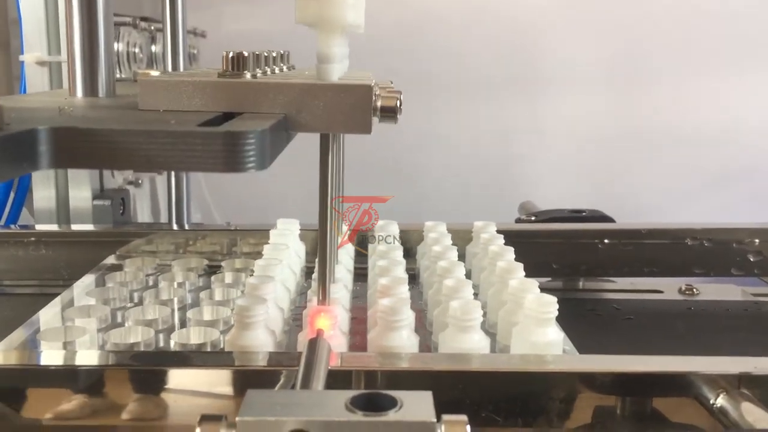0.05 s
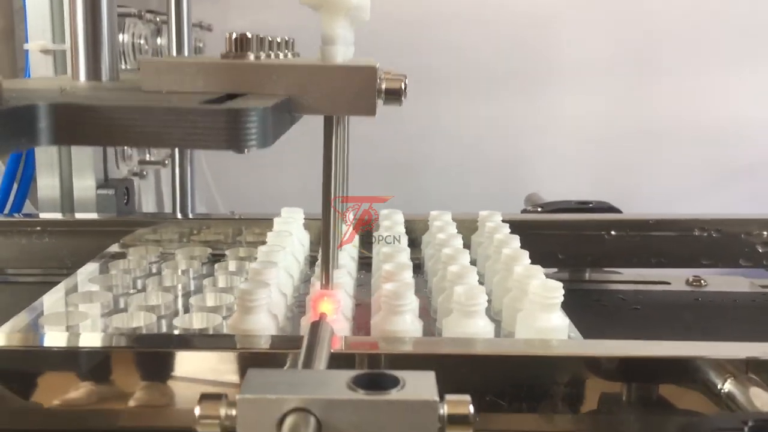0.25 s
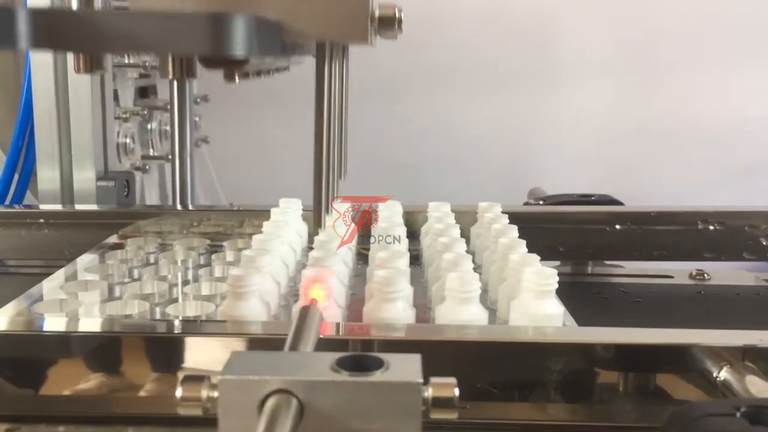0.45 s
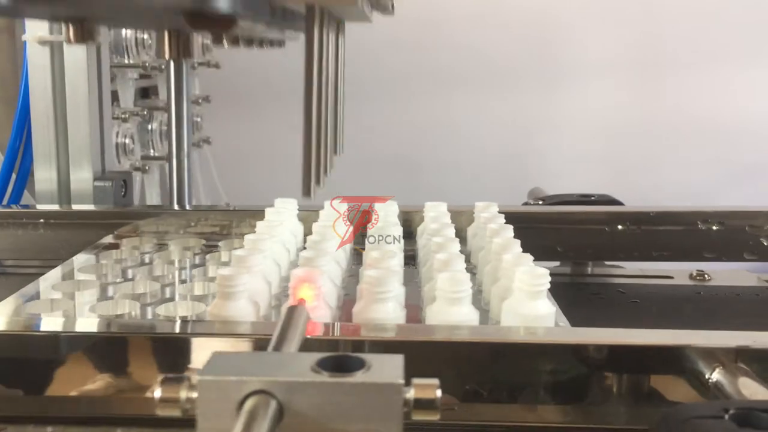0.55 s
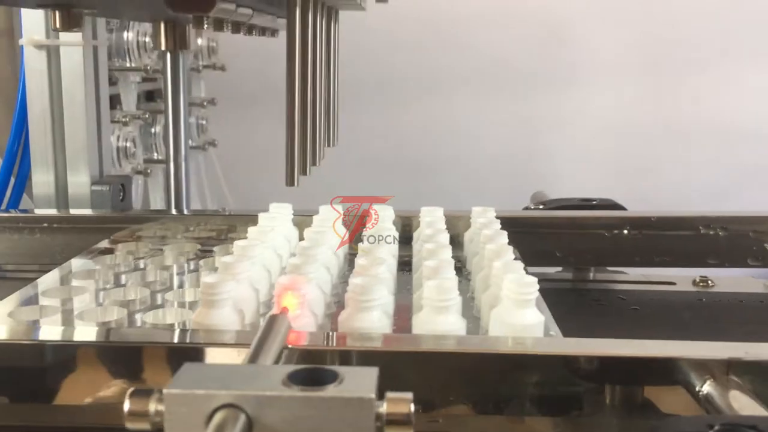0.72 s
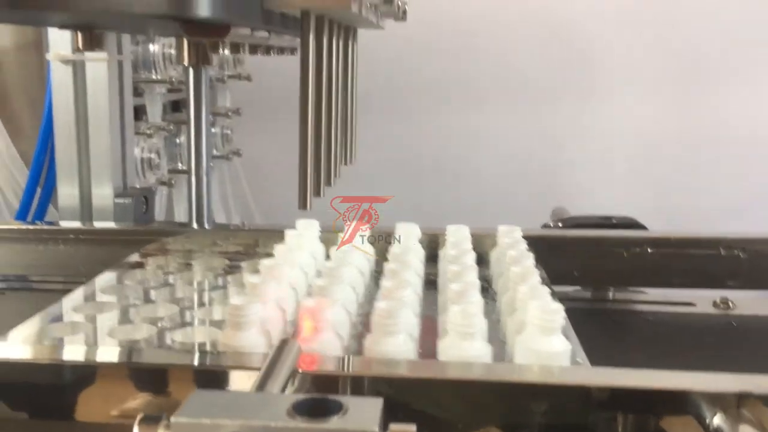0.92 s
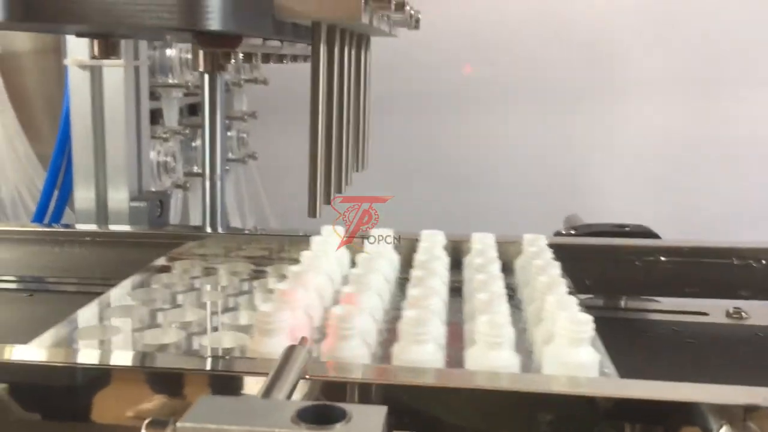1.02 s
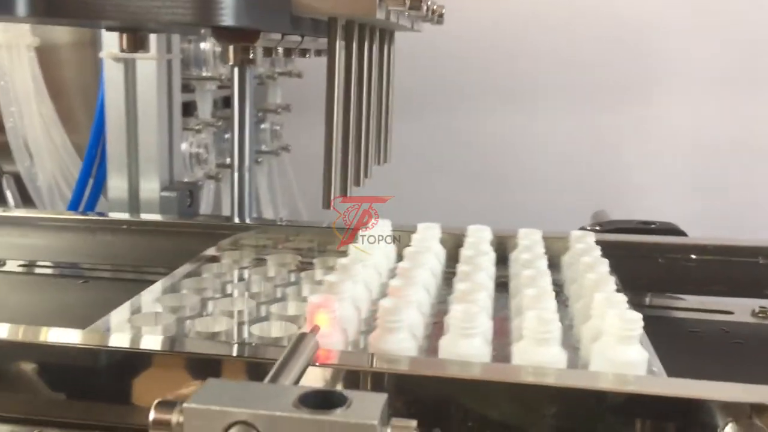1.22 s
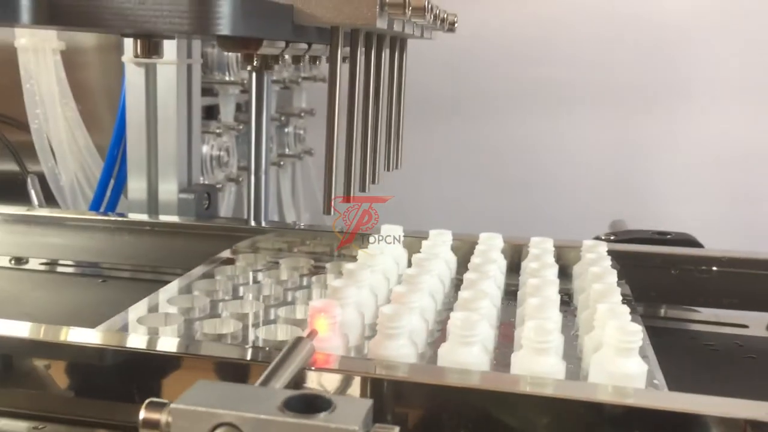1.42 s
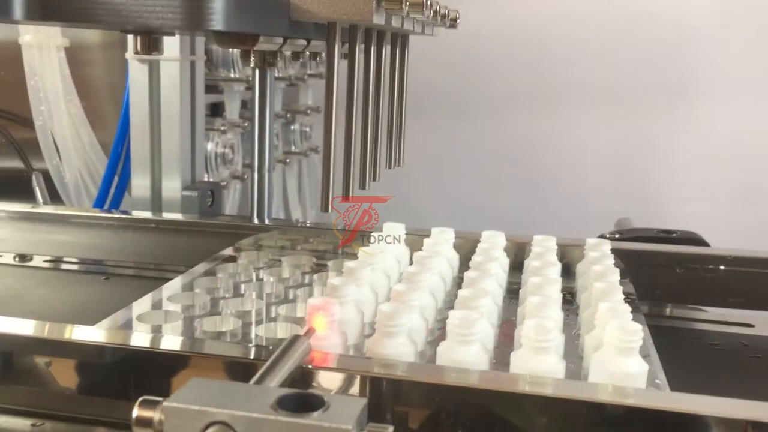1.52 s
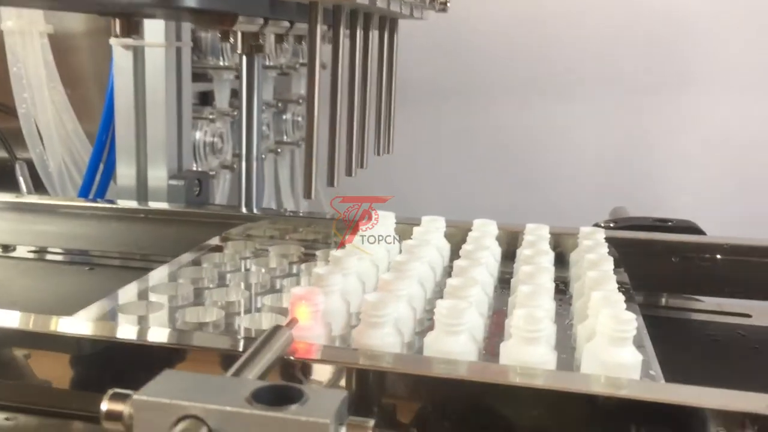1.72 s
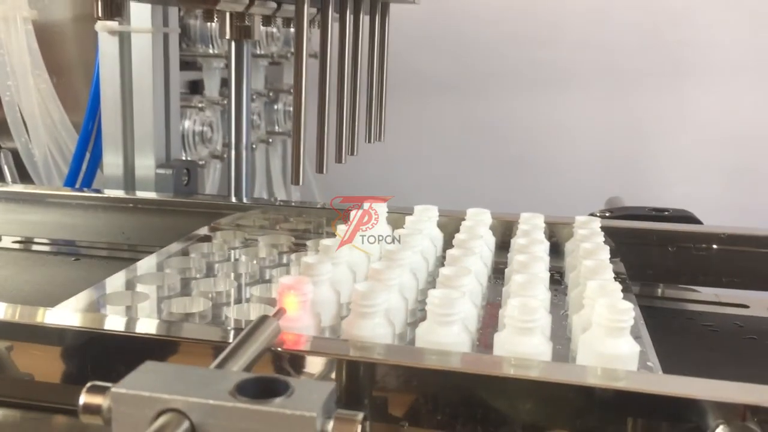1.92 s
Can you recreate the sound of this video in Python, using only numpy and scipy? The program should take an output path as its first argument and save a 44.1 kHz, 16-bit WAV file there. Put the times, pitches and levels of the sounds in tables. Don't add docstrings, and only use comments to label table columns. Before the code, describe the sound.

A hard metal clack and pneumatic hiss from a filling machine, ending in a dull thud indoors

```python
import sys
import numpy as np
from scipy import signal
from scipy.fft import rfft, irfft
from scipy.io import wavfile
from scipy.ndimage import uniform_filter1d

SR = 44100
rng = np.random.default_rng(int(sys.argv[2]) if len(sys.argv) > 2 else 0)


def generate_wav(sig):
    pcm = np.round(np.clip(np.atleast_2d(sig).T, -1, 1) * 32767).astype(np.int16)
    wavfile.write(sys.argv[1], SR, pcm)


def level_to_linear(level):
    exponent = np.asarray(level, float) / 20
    return 10 ** exponent


N = 85995


def evened(x):
    return x / np.sqrt(np.mean(x ** 2) + 1e-20)


def read(points, hz):
    f, value = np.transpose(points)
    return np.interp(np.log(hz + 1), np.log(f + 1), value)


def level(curve):
    s, db = np.transpose(curve)
    return level_to_linear(np.interp(np.arange(N) / SR, s, db))


def resonate(x, hz, width):
    turn = np.exp(2j * np.pi * hz * np.arange(len(x)) / SR)
    pole = np.exp(-np.pi * width / SR)
    return 2 * (turn * signal.lfilter([1 - pole], [1, -pole], x / turn)).real


def resonate_twice(x, hz, width):
    return evened(resonate(resonate(x, hz, width), hz, width))


def noise(spectrum, patchy_db, flicker_db):
    frames = N // 128 + 5
    a, b, patches = rng.standard_normal((frames, 257, 3)).T
    patches = uniform_filter1d(patches, size=5, axis=0)
    patches = evened(uniform_filter1d(patches, size=14, axis=1))
    flicker = evened(uniform_filter1d(rng.standard_normal(frames), size=4))
    z = (a + 1j * b) * level_to_linear(patchy_db * patches + flicker_db * flicker)
    x = signal.istft(z, nperseg=512, noverlap=384)[1][:N]
    colour = level_to_linear(read(spectrum, np.fft.rfftfreq(N, 1 / SR)))
    return evened(irfft(rfft(x) * colour, N))


def rings(peaks):
    return sum(level_to_linear(db) * resonate_twice(rng.standard_normal(N), hz, 1.5 * width) for hz, width, db in peaks)


def wobble(hz, wander):
    drift = uniform_filter1d(rng.standard_normal(N), size=3000)
    drift = evened(uniform_filter1d(drift, size=3000))
    return np.sqrt(2) * np.sin(2 * np.pi * np.cumsum(hz * (1 + wander * drift)) / SR)


def strike(hits, modes, soft_s):
    out, t = np.zeros(N), np.arange(SR // 2) / SR
    spots = rng.standard_normal((len(hits), len(modes)))
    for (s, db), spot in zip(hits, spots):
        ring = np.zeros(len(t))
        for (hz, mode_db, t60), luck in zip(modes, spot):
            ring += level_to_linear(mode_db + 2 * luck - 60 * t / t60) * np.sin(2 * np.pi * hz * t)
        ring *= 1 - np.exp(-t / soft_s)
        part = out[round(s * SR):][:len(t)]
        part += level_to_linear(db) * ring[:len(part)]
    return out


def hall():
    # frequency in Hz, density in dB per Hz.
    air_colour = [(40, -22), (90, -15), (103, 0), (139, -4.5), (302, 1.5), (376, -7.5), (654, -7.5),
                  (1330, -21), (5000, -40.5), (6500, -71.5), (11000, -120)]
    # time in seconds, level in dB.
    activity = [(0, -51.5), (.8, -46.5), (1.0, -46.5), (1.1, -50), (1.2, -46.5), (1.35, -51), (1.45, -53.5),
                (1.57, -50.5), (1.68, -54), (1.8, -51), (1.95, -51.5)]
    # frequency in Hz, width in Hz, level in dB.
    fans = [(700, 30, -66), (1050, 30, -66)]
    # time in seconds, level in dB.
    compressor = [(0, -79), (.17, -60), (.22, -45), (.9, -54.5), (1.05, -56), (1.1, -65.5), (1.18, -55),
                  (1.27, -68), (1.33, -50), (1.39, -67.5), (1.6, -67), (1.72, -75), (1.77, -53.5),
                  (1.82, -62), (1.87, -54), (1.95, -48)]
    # frequency in Hz, density in dB per Hz.
    hiss_colour = [(1180, -33), (2000, -3.5), (2180, -6.5), (2400, -3.5), (3370, -15), (16000, -24.5)]
    air = level(activity) * noise(air_colour, patchy_db=1.5, flicker_db=.8)
    hiss = level_to_linear(-72) * noise(hiss_colour, patchy_db=0, flicker_db=0)
    throb = level(compressor) * wobble(hz=63, wander=0.098)
    return air + hiss + rings(fans) + throb


def slide():
    # frequency in Hz, density in dB per Hz.
    rub_colour = [(35, -39), (60, -17.5), (233, -9.5), (437, -0.5), (1340, -2), (1620, -9), (4220, -16),
                  (12400, -29.5), (16000, -30.5)]
    # time in seconds, level in dB.
    travel = [(0, -39.5), (.08, -36.5), (.15, -39.5), (.24, -37), (.4, -42.5), (.66, -50), (.8, -86.5)]
    # frequency in Hz, width in Hz, level in dB.
    guide = [(494, 120, -1.5), (749, 200, -7.5), (1316, 76, -1), (4200, 400, -11)]
    rub = noise(rub_colour, patchy_db=.7, flicker_db=.6)
    return level(travel) * (rub + level_to_linear(-12) * evened(rings(guide)))


def ticks():
    # start in seconds, level in dB, ring in Hz, spread in Hz, t60 in seconds.
    taps_made = [(0.048, -38, 9050, 3460, 0.036), (0.1205, -36.5, 6600, 600, 0.02),
                 (.048, -42, 4500, 2500, 0.033), (.1205, -37.5, 4200, 2000, 0.049),
                 (.171, -36, 4500, 2500, .03), (0.12, -40, 10500, 3040, 0.054),
                 (.171, -36.5, 8140, 900, 0.018), (.1715, -39.5, 12500, 5000, 0.023),
                 (0.2418, -26, 9300, 1200, 0.074), (0.243, -25, 13500, 3000, 0.041),
                 (.6345, -29, 1600, 1100, 0.091), (.65, -44.5, 1200, 202.4, .8),
                 (.745, -47.5, 1220, 200, 0.27), (.06, -60, 12100, 39.5, 0.5),
                 (.733, -58.5, 13900, 2600, 0.14), (.718, -62, 7960, 1000, .04),
                 (.753, -66, 8800, 1600, .04), (.882, -63, 13500, 2530, .03),
                 (0.923, -49.5, 3470, 796, 0.064), (0.926, -61.5, 8700, 4020, 0.054),
                 (1.058, -62, 5170, 800, 0.045), (1.058, -64, 12850, 2500, 0.045),
                 (1.147, -60, 5000, 900, 0.07), (1.148, -57, 3033, 1500, 0.079),
                 (.99, -66, 6070, 120.3, .3), (1.148, -55.5, 13200, 2600, 0.13),
                 (1.15, -45, 765, 252, 0.16), (1.273, -65, 5700, 450, .03),
                 (1.322, -65.5, 14000, 2490, .02), (1.487, -72.5, 14000, 1983, 0.025),
                 (1.503, -66.5, 5530, 450, 0.033), (1.933, -66, 5300, 398, .03)]
    out, t = np.zeros(N), np.arange(5000) / SR
    fade_out = np.cos(np.pi / 2 * (t / t[-1]) ** 2)
    grains = rng.standard_normal((len(taps_made), len(t)))
    for (s, db, hz, spread, t60), grain in zip(taps_made, grains):
        tap = resonate_twice(grain, hz, 1.7 * spread) * level_to_linear(db - 60 * t / t60)
        tap *= np.minimum(t / (0.035 * t60), 1) * fade_out
        part = out[round(s * SR):][:len(t)]
        part += tap[:len(part)]
    return out


def latch():
    # frequency in Hz, level in dB, t60 in seconds.
    latch_modes = [(1134, -2, 0.01), (2530, -0.5, 0.0085), (2900, 0, 0.0081), (3700, -8, 0.01),
                   (4520, -12, 0.0067)]
    # start in seconds, level in dB.
    snaps = [
        (.2423, -15.5),
        (.2443, -18),
        (.2456, -9.5),
    ]
    return strike(snaps, latch_modes, soft_s=.0004)


def frame_shake():
    # frequency in Hz, width in Hz, level in dB.
    frame_peaks = [(61.53, 14, -12), (162, 63, -1.5), (245.4, 90, 1.5), (340, 48, 0.5), (450, 47, -6)]
    # time in seconds, level in dB.
    force = [(.25, -70), (.27, -25), (.35, -34), (.38, -39), (.55, -42), (.63, -44), (.75, -42.5),
             (1.0, -82)]
    return level(force) * evened(rings(frame_peaks))


def block():
    # frequency in Hz, level in dB, t60 in seconds.
    block_modes = [(75, -2.5, 0.09), (342, -6, 0.22), (535.3, -6.5, 0.069), (840, 0.5, 0.06),
                   (1013, -2.5, 0.05), (1225, -0.5, 0.054), (1510, 1, 0.034), (1850, -6, 0.04),
                   (2280, -7.5, 0.064), (2600, -6.5, 0.04), (2814, -5, .03), (3487, -7, .05)]
    # start in seconds, level in dB.
    rebounds = [(.2514, -29.5), (.2565, -18.5), (.2583, -21.5), (.2608, -18.5), (.2633, -23),
                (.2685, -21.5), (.2735, -29.5), (.287, -31)]
    return strike(rebounds, block_modes, soft_s=.0006)


def chatter():
    # frequency in Hz, density in dB per Hz.
    burst_colour = [(1180, -27), (2000, 3), (3810, -5), (4150, -2), (5730, -8), (6640, -8), (7770, -5),
                    (12000, -1.5), (16000, -7)]
    # frequency in Hz, width in Hz, level in dB.
    loose_metal = [(4140, 300, -3), (6700, 500, -2), (9400, 500, -6), (12000, 400, 0), (13800, 900, -2)]
    start_s, rise_s, hold_s, t60_s = .2522, 0.004, .012, 0.075
    t = np.arange(N) / SR - start_s
    shape = np.clip(t / rise_s, 0, 1) * level_to_linear(-60 * np.maximum(t - hold_s, 0) / t60_s)
    ragged = level_to_linear(2 * evened(uniform_filter1d(rng.standard_normal(N), size=50)))
    burst = noise(burst_colour, patchy_db=0, flicker_db=0) + .6 * evened(rings(loose_metal))
    return level_to_linear(-15) * shape * ragged * burst


def blow():
    # frequency in Hz, level in dB, t60 in seconds.
    plunger_modes = [(870, -3, .03), (1090, -1, .022), (1900, -5, .035), (2790, -6.5, .12)]
    start_s, hold_s, damp_s = .2523, .0036, .001
    after = np.maximum(np.arange(N) / SR - start_s - hold_s, 0)
    return strike([(start_s, -2)], plunger_modes, soft_s=.0003) * np.exp(-after / damp_s)


def jet():
    # frequency in Hz, density in dB per Hz.
    blast_colour = [(240, -33), (400, 1), (545, -15.5), (1220, -1.5), (3750, -6), (4440, -3), (7170, -10.5),
                    (10200, -29), (16000, -23)]
    # frequency in Hz, width in Hz, level in dB.
    tubing = [(2910, 220, -13), (4110, 150, -6), (5700, 230, -6), (7120, 250, -10.5), (9300, 450, -17.5),
              (12000, 900, -17), (13200, 900, -18.5), (14600, 800, -15.5)]
    # time in seconds, level in dB.
    blast_flow = [(.262, -67), (.275, -33), (.33, -39), (.42, -38.5), (.5, -36), (.6, -37), (.64, -36),
                  (.662, -44), (.675, -95)]
    blast = noise(blast_colour, patchy_db=.8, flicker_db=.6)
    return level(blast_flow) * (blast + level_to_linear(-6) * evened(rings(tubing)))


def whistle():
    # frequency in Hz, width in Hz, level in dB.
    whistle_peaks = [(4513, 75, -2), (3400, 90, -5.5)]
    # time in seconds, level in dB.
    whistle_flow = [(.3, -51), (.44, -52), (.48, -43.5), (.58, -43.5), (.63, -35.5), (.65, -48), (.68, -93)]
    return level(whistle_flow) * rings(whistle_peaks)


def table_sway():
    # time in seconds, level in dB.
    sway_level = [(.33, -63), (.39, -37.5), (.44, -32.5), (.47, -46), (.52, -31.5), (.56, -40), (.59, -42),
                  (.615, -40), (.64, -72.5)]
    return level(sway_level) * wobble(hz=85.5, wander=0.021)


def drain():
    # frequency in Hz, density in dB per Hz.
    drain_colour = [(1500, -20), (2500, -9), (4300, 0), (6000, -2.5), (7500, -10.5), (9000, -23),
                    (11000, -37)]
    # time in seconds, level in dB.
    drain_flow = [(.63, -75), (.66, -46.5), (.7, -54), (.76, -59), (.82, -72.5), (.9, -86)]
    return level(drain_flow) * noise(drain_colour, patchy_db=1.2, flicker_db=.8)


def end_stop():
    # frequency in Hz, level in dB, t60 in seconds.
    stop_modes = [(109, 1.5, 0.056), (256, -2.5, 0.1), (388, -2, 0.081), (174, -4.5, 0.082),
                  (658, 0.5, 0.047), (1000, -12.5, .03), (1250, -2.5, 0.031)]
    # start in seconds, level in dB.
    landings = [
        (.6355, -28.5),
        (.6435, -31),
        (.649, -31),
        (.6545, -25),
        (.666, -43),
    ]
    return strike(landings, stop_modes, soft_s=.002)


def thud():
    # frequency in Hz, level in dB, t60 in seconds.
    rocking_modes = [(81.55, -0.5, 0.49), (65.7, -7, 0.44)]
    # start in seconds, level in dB.
    rocks = [
        (.6445, -22),
    ]
    return strike(rocks, rocking_modes, soft_s=.003)


def leak():
    # frequency in Hz, density in dB per Hz.
    seep_colour = [(2000, -19.5), (6200, -4), (10500, -9.5), (14000, -11.5), (16000, -11.5)]
    # time in seconds, level in dB.
    seep_flow = [(.8, -91), (.88, -78), (.93, -66), (1.05, -71), (1.14, -68.5), (1.16, -71), (1.27, -82.5)]
    return level(seep_flow) * noise(seep_colour, patchy_db=1.5, flicker_db=1.2)


def room(x):
    # frequency in Hz, t60 in seconds.
    decay = [(80, .9), (300, 1), (1000, 0.76), (3000, 0.52), (4500, .65), (7000, 0.45), (9000, 0.44),
             (15000, 0.28)]
    taps = np.zeros(SR)
    at = np.arange(300, SR - 10, 10)
    taps[at + rng.integers(0, 10, len(at))] = rng.choice([-1., 1.], len(at))
    hz, t, z = signal.stft(taps, SR, nperseg=256)
    t60 = np.maximum(read(decay, hz), .05)[:, None]
    tail = signal.istft(z * level_to_linear(-60 * t / t60), SR, nperseg=256)[1]
    return signal.fftconvolve(x, tail / np.linalg.norm(tail))[:N]


def scene():
    blows = latch() + block() + blow() + end_stop() + thud()
    air = jet() + whistle() + drain() + leak()
    near = ticks() + blows + chatter() + air
    frame = frame_shake() + table_sway()
    return (hall() + slide() + near + frame + level_to_linear(-14.5) * room(near))[None]


def roll_off(x):
    return signal.sosfilt(signal.butter(12, 16830, fs=SR, output="sos"), x)


def record(dry):
    heard = dry[0] - 0.3 * resonate(dry[0], hz=10500, width=820)
    heard = signal.lfilter(*signal.butter(3, 46, "high", fs=SR), heard)
    limited = 1.12 * heard / (1 + (1.181 * heard) ** 6) ** (1 / 6)
    edge = signal.firwin(401, 16000, window=("kaiser", 9), fs=SR)
    return roll_off(signal.oaconvolve(limited, edge, "same")[None])


dry = scene()
out = record(dry)
generate_wav(out)
```